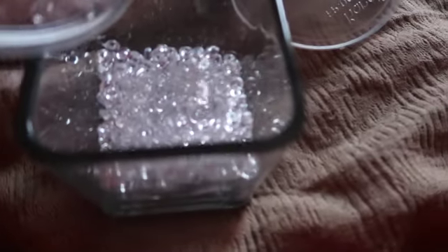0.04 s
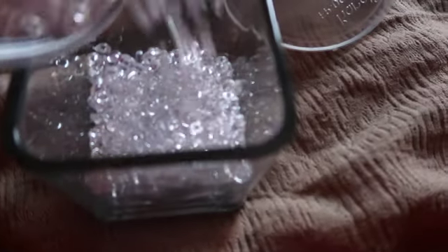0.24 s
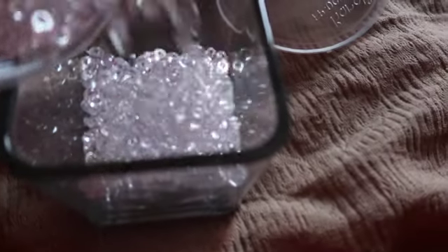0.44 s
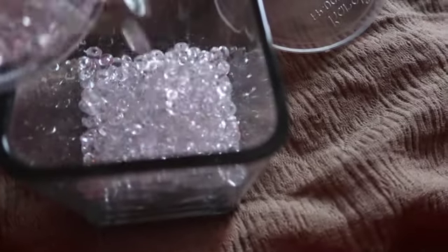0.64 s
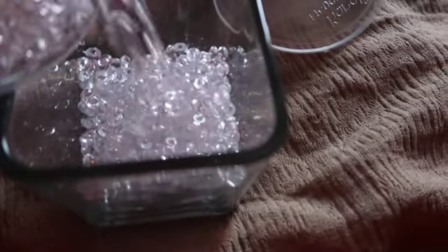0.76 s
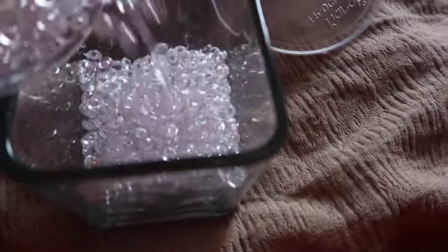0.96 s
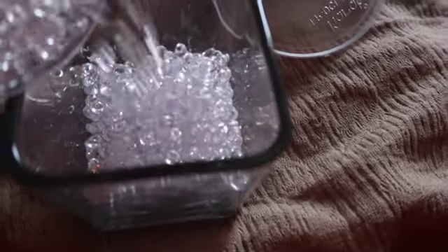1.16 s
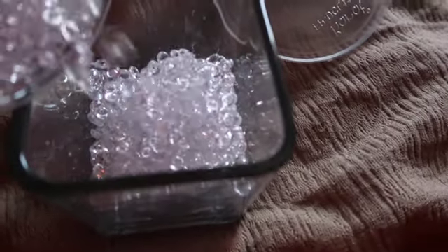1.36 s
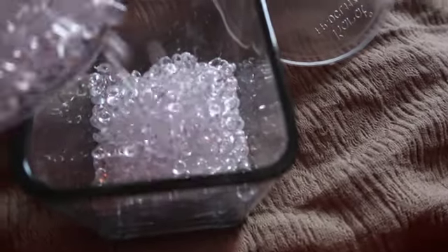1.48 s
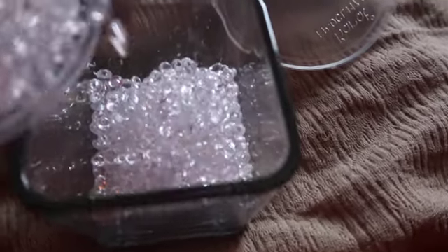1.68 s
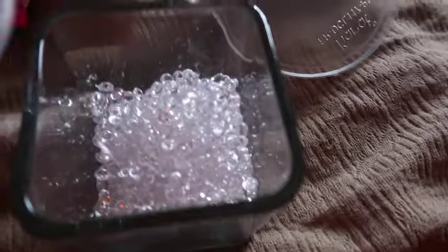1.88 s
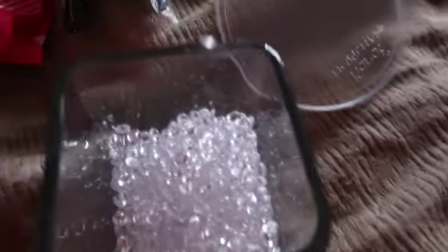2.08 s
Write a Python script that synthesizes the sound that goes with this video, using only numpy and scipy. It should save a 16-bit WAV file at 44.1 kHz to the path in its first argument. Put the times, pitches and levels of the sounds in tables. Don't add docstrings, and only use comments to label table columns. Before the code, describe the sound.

A crisp glassy rattle of tiny beads filling a glass container, breaking off, then a brief shift.

```python
import sys
import numpy as np
from scipy import signal
from scipy.fft import rfft, irfft, next_fast_len
from scipy.io import wavfile

SR = 44100
rng = np.random.default_rng(int(sys.argv[2]) if len(sys.argv) > 2 else 0)


def magnitude_from_level(level_db):
    exponent = np.asarray(level_db, float) / 20
    return 10 ** exponent


def store_pcm(level_fs):
    pcm = np.round(np.clip(level_fs, -1, 1) * 32767).astype(np.int16)
    wavfile.write(sys.argv[1], SR, np.atleast_2d(pcm).T)


N = 93403

# (time [s], level [dB], hollow sound of the jar's air [dB])
POUR = [(0, -47.5, 14.5), (0.019, -36, -8.5), (0.039, -60, 8), (0.048, -45, 7), (.115, -39, -9.5),
        (0.216, -34, -7), (0.33, -34, -5), (0.459, -35, -8.5), (0.601, -41, -3), (0.742, -35, -12.5),
        (0.88, -39.5, -3.5), (1.03, -41.5, -5.5), (1.19, -36, -14.5), (1.32, -46.5, -1.5),
        (1.354, -53.5, 7), (1.45, -38.5, -8), (1.531, -56, -16), (1.66, -61, -12.5)]
# (time [s], level [dB], time to fade by 60 dB [s])
LAST_CLUMPS = [(1.543, -40, 0.24), (1.567, -32.5, 0.14), (1.591, -31.5, 0.069), (1.653, -38.5, 0.11),
               (1.702, -44, 0.15), (1.722, -47, 0.093), (1.764, -42.5, 0.093), (1.784, -55.5, 0.12),
               (1.837, -63, 0.15), (1.889, -62.5, 0.26)]
# (time [s], level [dB])
HEAP_SLIDE = [
    (1.959, -79),
    (1.976, -52),
    (1.992, -41),
    (2.04, -41.5),
    (2.065, -48.5),
    (2.074, -40),
    (2.118, -40.5),
]
# (time [s], peak [dB], pitch [Hz])
BEADS_EARLY = [(0.0064, -28, 2140), (0.0105, -18, 2780), (0.0479, -34, 2810), (0.0514, -34, 3130),
               (0.0909, -26, 2910), (0.1121, -23, 2980), (0.1151, -25, 5610), (0.1197, -27, 5880),
               (0.1359, -25, 5680), (0.1508, -25, 6750), (0.1744, -22, 5740), (0.2023, -24, 2720),
               (0.2085, -19, 2280), (0.2189, -26, 6340), (0.2314, -25, 2860), (0.2437, -22, 6240),
               (0.2505, -26, 6080), (0.2657, -26, 5850), (0.2716, -23, 5710), (0.2748, -26, 5610),
               (0.2819, -24, 5670), (0.2918, -24, 7020), (0.3047, -22, 2530), (0.3172, -19, 5250),
               (0.3318, -27, 3560), (0.3513, -24, 5870), (0.3581, -24, 2550), (0.3707, -24, 6690),
               (0.3767, -28, 6200), (0.3857, -25, 3700), (0.3969, -24, 6880), (0.4024, -23, 3090),
               (0.4192, -25, 5780), (0.4264, -23, 6050), (0.4294, -24, 6340), (0.4415, -18, 2730),
               (0.4536, -25, 6330), (0.4719, -25, 8460), (0.4797, -29, 5820), (0.5047, -28, 2290),
               (0.5091, -21, 3110), (0.5322, -25, 3170), (0.5504, -24, 6070), (0.5592, -27, 5950),
               (0.5712, -30, 6260), (0.603, -28, 5600), (0.6131, -25, 5680), (0.6347, -27, 5940),
               (0.6389, -30, 6370), (0.6585, -28, 3500), (0.6672, -31, 3500), (0.6882, -23, 5210),
               (0.7099, -27, 2540), (0.7163, -28, 3620)]
# (time [s], peak [dB], pitch [Hz])
BEADS_LATE = [(0.7504, -18, 5660), (0.7791, -29, 4860), (0.8039, -28, 5240), (0.8064, -23, 5320),
              (0.8175, -28, 4330), (0.8322, -29, 5180), (0.8486, -28, 5570), (0.8512, -26, 5290),
              (0.8687, -27, 5500), (0.9134, -17, 2670), (0.9289, -20, 2690), (0.9351, -28, 2650),
              (0.9417, -25, 6340), (0.9538, -29, 6100), (0.9611, -31, 2170), (0.9867, -25, 5740),
              (0.9917, -28, 5360), (1.0048, -19, 5070), (1.0266, -25, 5060), (1.0441, -26, 5820),
              (1.0573, -27, 4690), (1.0608, -31, 6430), (1.0668, -31, 6360), (1.0833, -29, 5470),
              (1.1038, -25, 5040), (1.1077, -24, 6280), (1.128, -25, 5760), (1.1459, -27, 5060),
              (1.1503, -26, 5620), (1.1613, -21, 2870), (1.1847, -27, 5040), (1.1921, -23, 6340),
              (1.1946, -24, 6350), (1.2001, -17, 5070), (1.2231, -28, 5470), (1.2273, -28, 5350),
              (1.2297, -30, 5350), (1.2333, -28, 6450), (1.2586, -30, 5150), (1.2767, -22, 5440),
              (1.3014, -30, 5000), (1.3194, -30, 3560), (1.3238, -27, 3410), (1.3749, -29, 3150),
              (1.3913, -34, 3840), (1.4191, -29, 4930), (1.4289, -29, 2650), (1.4385, -27, 6120),
              (1.4543, -25, 2900), (1.4607, -29, 5120), (1.4949, -31, 5080), (1.5041, -34, 5140)]
# (time [s], peak [dB], pitch [Hz])
BEADS_LAST = [(1.5449, -27, 2670), (1.5521, -31, 4840), (1.5682, -18, 5560), (1.5746, -24, 4720),
              (1.5802, -25, 5510), (1.5877, -26, 2520), (1.5951, -27, 7280), (1.6103, -36, 4740),
              (1.6352, -48, 2540), (1.643, -36, 4410), (1.6485, -33, 3120), (1.6548, -20, 3250),
              (1.6663, -29, 4910), (1.685, -37, 5230), (1.7005, -26, 3080), (1.7078, -39, 2950),
              (1.7253, -29, 5300), (1.7388, -44, 5040), (1.7448, -48, 5360), (1.7654, -23, 4900),
              (1.7766, -36, 5100), (1.7772, -45, 1080), (1.786, -39, 4690), (1.8088, -53, 1120),
              (1.8486, -34, 6330), (1.8877, -43, 9800)]
# (time [s], peak [dB], pitch [Hz])
BEADS_SLIDING = [(1.9859, -26, 4390), (1.9891, -29, 1270), (1.9943, -31, 4820), (2.0134, -25, 7710),
                 (2.0287, -33, 1230), (2.048, -31, 1080), (2.0529, -37, 900), (2.0727, -30, 990),
                 (2.079, -31, 6420), (2.0871, -27, 1420), (2.0952, -29, 6030), (2.1045, -29, 4520)]
# (time [s], peak [dB], pitch [Hz])
BEADS_DEEP = [(0.006, -33, 1510), (0.016, -31, 1230), (0.0227, -33, 1070), (0.1507, -34, 1280),
              (0.1816, -34, 1510), (0.2085, -29, 1020), (0.2288, -34, 1300), (0.2738, -37, 1280),
              (0.3198, -35, 1300), (0.4235, -34, 1630), (0.4413, -34, 1270), (0.6345, -38, 1400),
              (0.7068, -36, 1420), (0.7504, -38, 1300), (0.7826, -40, 1100), (0.9131, -35, 1370),
              (0.9603, -32, 1370), (1.0036, -37, 1300), (1.1041, -43, 1170), (1.3114, -37, 1290)]
# (time [s], peak [dB], pitch [Hz])
WALL_KNOCKS = [
    (1.713, -44, 1050),
    (1.798, -40.5, 1020),
    (1.85, -45, 1010),
]
# (pitch [Hz], level [dB], 60 dB fade [s])
JAR_MODES = [(617, -11.5, 0.0041), (1050, -17.5, 0.029), (1283, -9, 0.024), (1750, -14, 0.011),
             (2368, 6.5, 0.0056), (3192, 2.5, 0.0053), (3800, -3, 0.0017), (4980, -3.5, 0.0048),
             (5730, 0.5, 0.0036), (5913, -4, 0.0094), (7860, 1.5, 0.0023), (8930, -3.5, 0.0037),
             (10810, 3.5, 0.0023), (11990, -5, 0.0048)]
# (frequency [Hz], change [dB])
MOVED_JAR = [(600, 9), (1200, 5), (2500, 6), (4500, 11.5), (12000, 1)]
# (time [s], level [dB], pitch [Hz])
BLANKET_THUMPS = [
    (0.312, -62, 190),
    (0.409, -30, 111),
    (0.451, -54, 115),
    (1.189, -67, 150),
    (1.52, -62, 90),
    (1.614, -52, 88),
]
# (frequency [Hz], level [dB])
HISS_COLOUR = [(40, -19), (120, -3.5), (400, -4.5), (1100, 11), (4000, -9.5), (6000, -33), (16000, -20)]
# (time [s], share [0-1])
HEAP_CANCELS = [(0.5, 0), (0.8, .75), (1.0, .45), (1.15, .7), (1.6, .9)]

TIME = np.arange(N) / SR
MODE_HZ, MODE_DB, MODE_T60_S = np.transpose(JAR_MODES)
AIR_MODES = 4
TICK_SAMPLES = 2048
QUIET_PART_DB = -15


def rms_one(x):
    return x / np.sqrt(np.mean(x ** 2) + 1e-20)


def at_hz(points, hz):
    table_hz, table_db = np.transpose(points)
    return np.interp(np.log(hz), np.log(table_hz), table_db)


def convolve(x, h):
    size = next_fast_len(N + h.shape[-1])
    return irfft(rfft(x, size) * rfft(h, size), size)[..., :N]


def drift(rate_hz):
    r = np.exp(-2 * np.pi * rate_hz / SR)
    noise = rng.standard_normal(N + 4000)
    return rms_one(signal.lfilter([1], [1, -2 * r, r * r], noise)[4000:])


def no_bass(x, hz):
    return signal.sosfilt(signal.butter(4, hz, "high", fs=SR, output="sos"), x)


def floor():
    hz = np.fft.rfftfreq(N, 1 / SR) + 1
    mid, side = rfft(rng.standard_normal((2, N))) * magnitude_from_level(at_hz(HISS_COLOUR, hz))
    side = side * np.clip(hz / 5000, .25, 1)
    return magnitude_from_level(-76) * rms_one(irfft([mid + side, mid - side], N))


def tick(shape_db, pitch_hz=None):
    draw = rng.standard_normal((len(shape_db), 64))
    pitch_draw, level_draw, sign_draw, turn_draw = np.split(draw[:, :56], 4, axis=1)
    lag_draw, echo_gain, echo_delay = draw[:, 56], draw[:, 57:60, None], draw[:, 60:63, None]
    hz = MODE_HZ * (1 + .12 * pitch_draw)
    gain = magnitude_from_level(MODE_DB + shape_db + 2.8 * level_draw) * np.sign(sign_draw)
    if pitch_hz is not None:
        nearest = np.abs(np.log(hz / pitch_hz[:, None])).argmin(1)
        hz[np.arange(len(hz)), nearest] = pitch_hz

    turn = .35 * np.minimum(hz / 6000, 1)[:, None] * np.stack([turn_draw, -turn_draw], 1)
    lag_s = np.stack([0 * lag_draw, 3.7e-5 + 6e-6 * lag_draw], 1)
    t = np.maximum(np.arange(1000) / SR - lag_s[..., None, None], 0)

    waves = np.sin(2 * np.pi * hz[:, None, :, None] * t + turn[..., None])
    bead_damping = .6
    fade = magnitude_from_level(-60 * t / MODE_T60_S[:, None] / bead_damping)
    rise = 1 - np.exp(-t / .00012)
    rings = gain[:, None, :, None] * waves * fade * rise
    hollow = rings[:, :, :AIR_MODES].sum(2)
    bright = rings[:, :, AIR_MODES:].sum(2)

    w = 2 * np.pi * np.fft.rfftfreq(TICK_SAMPLES, 1 / SR)
    echoes = echo_gain * np.exp(-1j * w * .0004 * np.abs(echo_delay))
    walls = 1 + magnitude_from_level(-7) * echoes.sum(1)
    bright_only = (1j * w / (1j * w + 2 * np.pi * 2706)) ** 3
    part_filter = np.stack([np.ones_like(w), bright_only])
    spectrum = rfft(np.stack([hollow, bright], 1), TICK_SAMPLES)
    return irfft(spectrum * walls[:, None, None] * part_filter[:, None], TICK_SAMPLES)


def rattle(level_db, hollow_db, per_s, spread_db, colour_db, count):
    chance = rng.random((2, N))
    clumping_db = 1.5 * (drift(40) + drift(9))
    born = chance < per_s * magnitude_from_level(clumping_db) / SR
    sizes = magnitude_from_level(spread_db * np.minimum(rng.exponential(1, (2, N)), 2.0))
    hits = rms_one(born * sizes * rng.choice([-1, 1], (2, N)))
    hits = hits * magnitude_from_level(np.stack([level_db + hollow_db, level_db]))
    dealt = rng.integers(0, count, N)
    spots = tick(np.tile(colour_db, (count, 1)))
    spots = spots / np.sqrt((spots ** 2).sum((1, 2, 3), keepdims=True) / 2)

    size = next_fast_len(N + TICK_SAMPLES)
    total = 0
    for k, spot in enumerate(spots):
        spot_hits = rfft(hits * (dealt == k), size)
        total = total + (spot_hits[:, None] * rfft(spot, size)).sum(0)
    return irfft(total, size)[:, :N]


def stream():
    s, db, hollow_db = np.transpose(POUR)
    power = magnitude_from_level(2 * np.interp(TIME, s, db, right=-120))
    for at, level_db, t60 in LAST_CLUMPS:
        scatter_db = level_db - 60 * np.maximum(TIME - at, 0) / t60
        power = power + (TIME > at) * magnitude_from_level(2 * scatter_db)
    hollow_db = np.interp(TIME, s, hollow_db)
    colour_db = np.zeros(len(MODE_HZ))
    return rattle(10 * np.log10(power), hollow_db, per_s=3500, spread_db=4.2, colour_db=colour_db, count=26)


def single_ticks(*tables, low_bright_db=QUIET_PART_DB):
    s, db, hz = np.concatenate(tables).T
    octaves_away = np.log2(MODE_HZ / hz[:, None])
    ticks = tick(14 * np.exp(-(octaves_away / .45) ** 2), hz)
    hollow = ticks[:, 0] * magnitude_from_level(QUIET_PART_DB * (hz > 2000))[:, None, None]
    bright = ticks[:, 1] * magnitude_from_level(low_bright_db * (hz < 1750))[:, None, None]
    out = np.zeros((2, N + TICK_SAMPLES))
    for at, level_db, one in zip(s, db, bright + hollow):
        start = int(at * SR)
        peak = np.abs(one.mean(0)).max()
        out[:, start:start + TICK_SAMPLES] += magnitude_from_level(level_db - .7) * one / peak
    return out[:, :N]


def room(x):
    t = np.arange(SR // 4) / SR
    mid, side = rng.standard_normal((2, len(t))) * magnitude_from_level(-60 * t / .12) * (t > .003)
    side = signal.lfilter(*signal.butter(1, 5000, "high", fs=SR), side)
    tail = np.stack([mid + side, mid - side])
    tail = tail / np.sqrt((tail ** 2).sum(1, keepdims=True))
    return magnitude_from_level(-23) * convolve(x.mean(0), tail)


def thumps():
    out = np.zeros(N)
    for s, db, hz in BLANKET_THUMPS:
        t = np.maximum(TIME - s, 0)
        fade = magnitude_from_level(-60 * t * hz / 2.1 / 2)
        rise = (1 - np.exp(-2 * hz * t)) ** 2
        out = out + magnitude_from_level(db) * np.sin(2 * np.pi * hz * t) * fade * rise
    return out


def heap_valley(x):
    centre_hz, width_hz = 1800, 1000
    band = signal.lfilter(*signal.iirpeak(centre_hz, centre_hz / width_hz, fs=SR), x)
    share = np.interp(TIME, *np.transpose(HEAP_CANCELS))
    return x - np.clip(share, 0, 1) * band


def slide():
    s, db = np.transpose(HEAP_SLIDE)
    level_db = np.interp(TIME, s, db, left=-140)
    colour_db = at_hz(MOVED_JAR, MODE_HZ)
    return rattle(level_db, np.zeros(N), per_s=3000, spread_db=3.5, colour_db=colour_db, count=10)


def scene():
    filtered = heap_valley(stream() + single_ticks(BEADS_LAST, WALL_KNOCKS))
    poured = filtered + single_ticks(BEADS_EARLY, BEADS_LATE, BEADS_DEEP)
    moved = slide() + single_ticks(BEADS_SLIDING, low_bright_db=1.5)
    beads = no_bass(poured, 732) + no_bass(moved, 530)
    balance = magnitude_from_level(np.array([[.6], [-.6]]))
    return (beads + room(beads) + thumps() + floor()) * balance


def low_pass(x):
    return signal.sosfilt(signal.butter(12, 16470, fs=SR, output="sos"), x)


def record(dry):
    mix = signal.sosfilt(signal.butter(3, 13500, fs=SR, output="sos"), dry)
    return low_pass(mix)


dry = scene()
out = record(dry)
store_pcm(out)
```